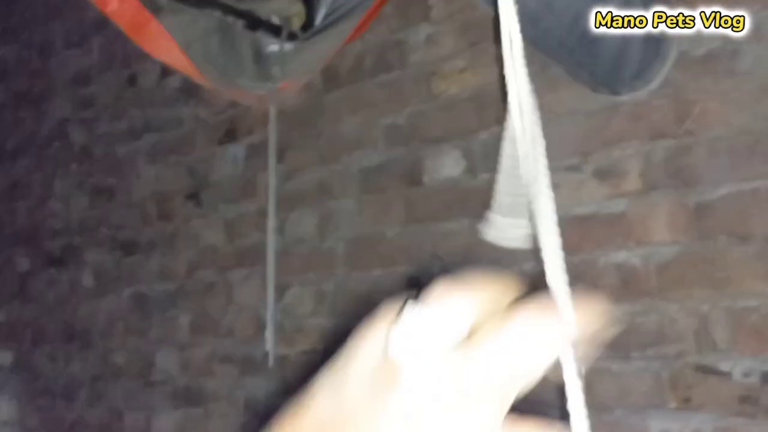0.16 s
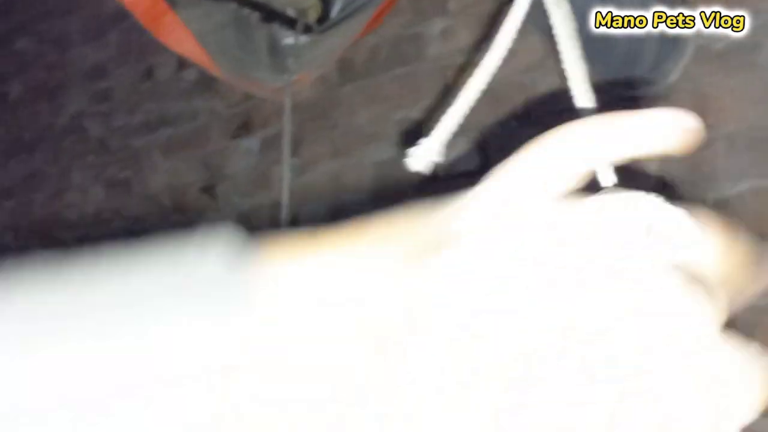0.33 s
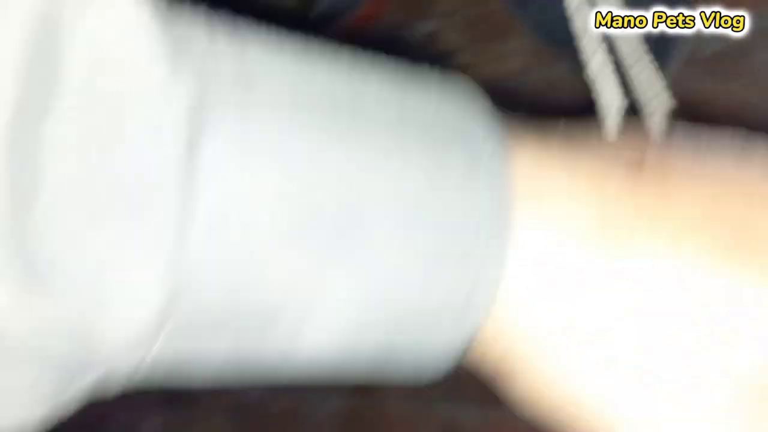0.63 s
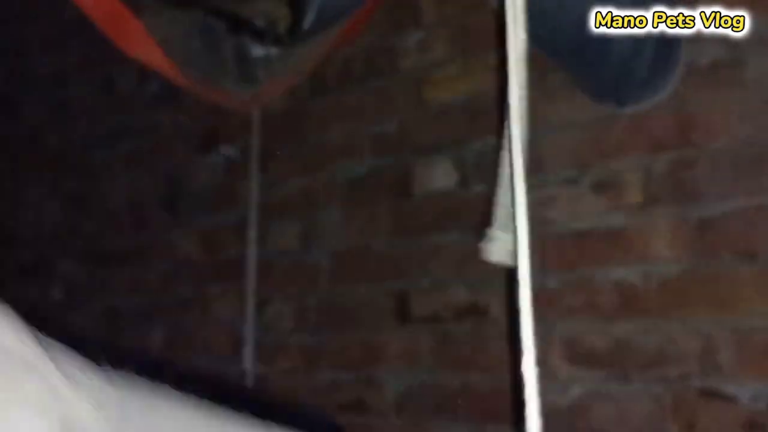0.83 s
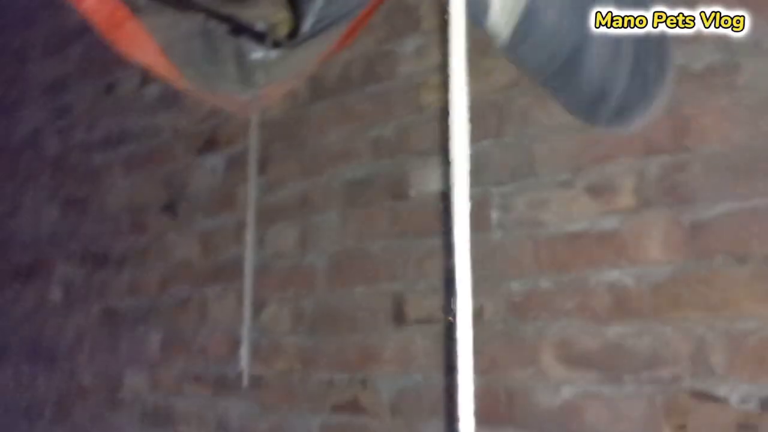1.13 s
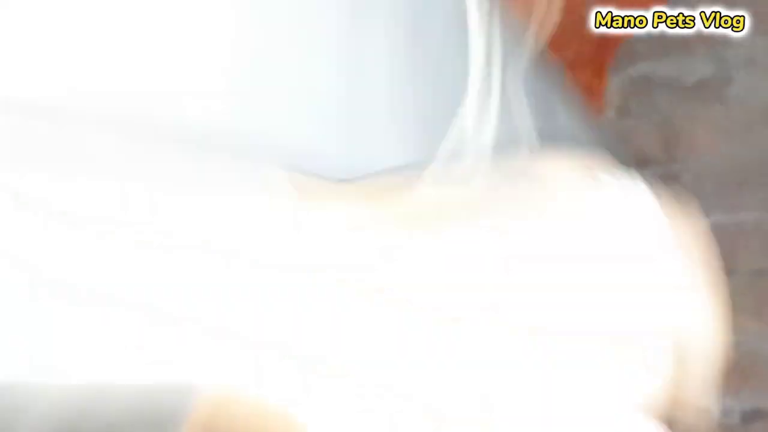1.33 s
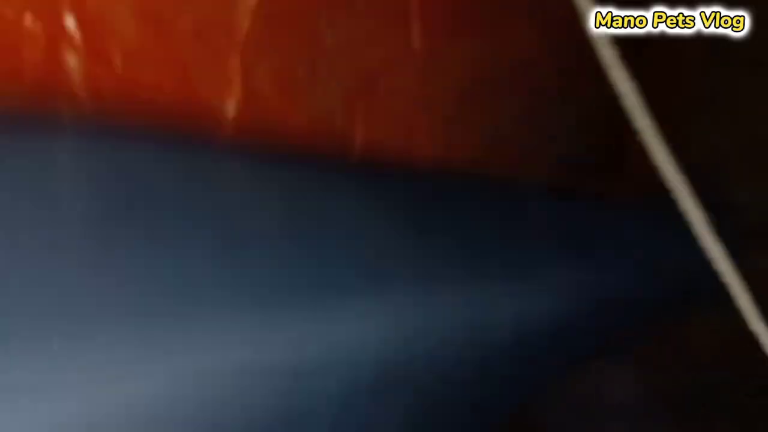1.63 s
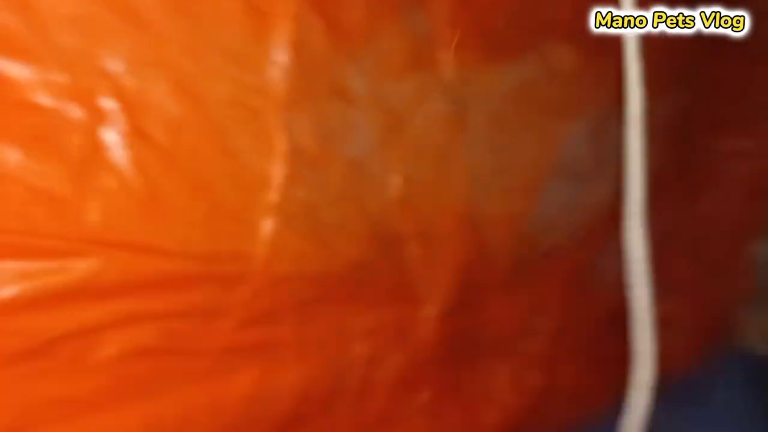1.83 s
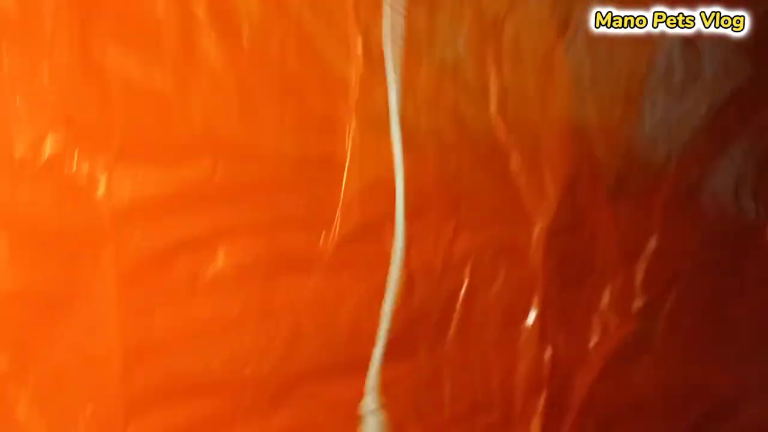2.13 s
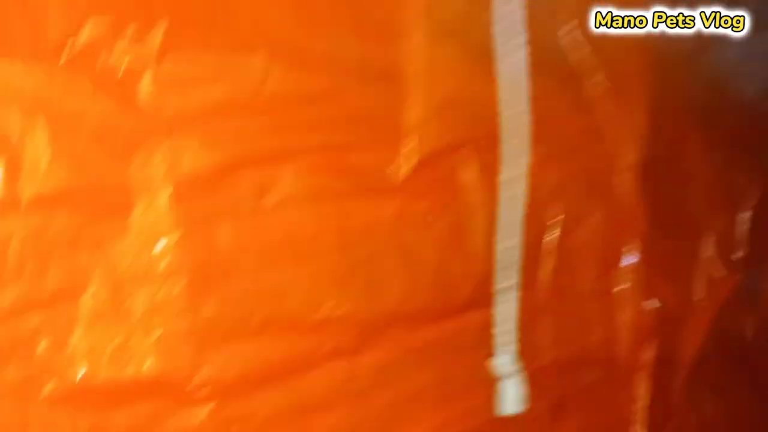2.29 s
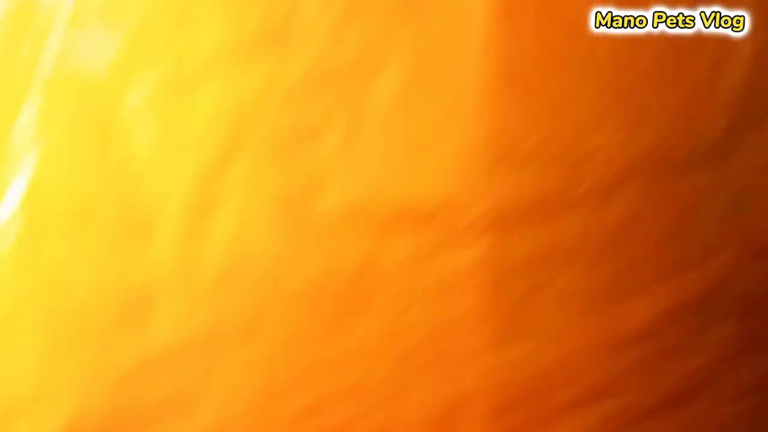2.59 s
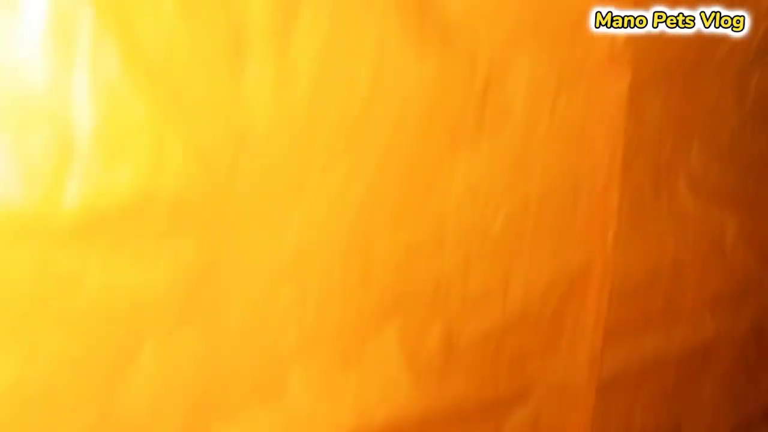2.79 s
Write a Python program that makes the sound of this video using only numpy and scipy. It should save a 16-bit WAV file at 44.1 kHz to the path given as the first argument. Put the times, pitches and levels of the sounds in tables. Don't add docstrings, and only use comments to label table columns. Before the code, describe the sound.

Crinkling plastic sheeting slides and crackles close up, with cord rubs and hard knocks on the microphone

```python
import sys
import numpy as np
from scipy import signal
from scipy.fft import rfft, irfft
from scipy.io import wavfile

SR = 44100
rng = np.random.default_rng(int(sys.argv[2]) if len(sys.argv) > 2 else 0)


def store_pcm(level_fs):
    pcm = np.round(np.clip(level_fs, -1, 1) * 32767).astype(np.int16)
    wavfile.write(sys.argv[1], SR, np.atleast_2d(pcm).T)


def field_ratio(decibels):
    return 10 ** (np.asarray(decibels, dtype=float) / 20)


N = 130095

# f/Hz, density/dB
SHED_SPECTRUM = [(25, -26), (60, -3.5), (90, -2), (180, -15.5), (400, -16), (830, -32), (3000, -36.5),
                 (15500, -61)]
# t/s, rise/s, fall/s per 20 dB, level/dB, f/Hz
CASE_BUMPS = [(-.02, 0.027, 0.1, -29, 120.4), (-.02, 0.051, -0.25, -33, 274), (0.439, 0.016, 0.2, -37, 183),
              (2.812, 0.029, 0, -31.5, 240), (.715, 0.022, 0.1, -29, 170), (0.718, 0.031, 0.02, -26.5, 287),
              (1.052, 0.012, 0.08, -13.5, 64), (1.056, 0.0074, -0.03, -23, 167),
              (1.051, 0.0025, 0.06, -26.5, 503), (1.101, 0.015, 0.0751, -18.5, 87),
              (1.139, 0.032, 0.15, -27.5, 57), (1.35, 0.03, -0.7, -24, 67.5),
              (1.471, 0.02, -0.03, -18.5, 97.4), (1.474, 0.015, 0.03, -21.5, 259),
              (1.85, 0.078, 0.1, -30, 82.6), (1.895, 0.0067, 0.23, -32, 263),
              (2.361, 0.033, -0.22, -31.5, 85), (2.537, 0.0087, 0.16, -25.5, 93.7),
              (2.808, 0.029, 0.12, -30.5, 450), (2.722, 0.011, .05, -32.5, 450),
              (.49, 0.0093, -0.14, -29, 577)]
# t/s, rise/s, fall/s per 20 dB, level/dB, case hum re level/dB
RUB_STROKES = [(0, 0.1, -0.18, -34, -17), (.1, 0.021, -0.18, -46, -27), (.1655, 0.0059, 0, -32.5, -11),
               (.178, .02, .08, -36, -5.5), (.256, 0.013, 0.0543, -23, -17),
               (.27, 0.012, 0.11, -20.5, -8.5), (.344, .005, 0.09, -25.5, -4), (.355, 0.031, 0.1, -24, -1),
               (.436, 0.0054, 0.12, -23, -5.5), (.47, 0.025, 0.14, -33.5, -1.5),
               (.543, 0.0043, 0.14, -32, -5), (.556, 0.011, 0.13, -28.5, -0.5),
               (.59, 0.025, 0.0851, -28, 1), (.65, 0.047, -0.06, -49, 11), (.706, 0.033, 0.24, -37.5, 0),
               (.815, 0.032, 0.1, -33, -27), (2.809, 0.011, 0.09, -32.5, 6), (2.83, 0.014, 0.3, -39.5, 0),
               (2.908, 0.022, -5, -37.5, 5)]
# f/Hz, density/dB
RUB_SPECTRUM = [(450, -11), (800, -8), (1400, -1.5), (2500, 0.5), (4200, -2), (7000, -7.5), (10000, -6.5),
                (15500, -12)]
# f/Hz, width/Hz, level/dB
CASE_MODES = [(229, 90, -6), (330, 98, -6.5), (396.3, 45, -1), (452, 58, -0.5), (544, 257, -6.5),
              (820, 630, -13.5)]
# t/s, hiss left-right/dB, case left-right/dB, extra treble/dB
CAMERA_SWING = [(0, -4, -1, 5.5), (.17, -8, 1.5, -0.5), (.5, -7, 0, -1.5), (1.3, -4, 1.5, 3),
                (1.42, -2, 9.5, 1.5), (1.5, -1, 22.5, 2.5), (1.6, -2, 12, 5), (1.75, -5.5, 5.5, 4),
                (2.0, -3.5, 2, -2.5), (2.5, -4, 1.5, 1.5), (2.95, -8.5, 2, -2)]
# t/s, peak/dB, panel f/Hz
SHARP_SNAPS = [(.167, -22, 2800), (.199, -25, 2177), (0.439, -17, 4030), (1.594, -26, 2050),
               (1.6292, -18.5, 2830), (1.8435, -13, 3800), (1.854, -13, 3170), (1.8661, -13.5, 5930),
               (1.8946, -9.5, 2740), (1.9045, -12.5, 3070), (1.913, -4.5, 3320), (1.925, -16, 6930),
               (2.016, -14, 6060), (2.025, -11, 4970), (2.044, -20, 6800), (2.0745, -17, 5050),
               (2.088, -21, 4050), (2.276, -19.5, 4000), (2.3022, -17.5, 2530), (2.326, -12.5, 6040),
               (2.348, -12, 4000), (2.3877, -20, 4000), (2.6977, -24, 4000), (2.8105, -25, 2360)]
# t/s, level/dB, contact with the case/dB
SHEET_SLIDE = [(1.045, -47.5, -2), (1.055, -35, 9), (1.2, -32, 2), (1.38, -27, 0), (1.485, -23.5, 1),
               (1.51, -50, 11), (1.565, -44, -8), (1.595, -36, -9), (1.67, -31.5, -6.5), (1.8, -29.5, -0.5),
               (1.95, -27, 3), (2.08, -31, -4.5), (2.15, -33.5, 3.5), (2.4, -29, 0), (2.65, -32, 1.5),
               (2.74, -40, 2.5), (2.79, -54, 3.5)]
# t/s, rise/s, fall/s per 20 dB, level/dB, case hum re level/dB
CREASE_BURSTS = [(1.0495, 0.0011, 0.01, -23, 6), (1.19, 0.044, -0.71, -31.5, 6.5),
                 (1.27, 0.076, 0.1145, -20.5, -1.5), (1.325, 0.0081, -0.0567, -18, 1.5),
                 (1.43, 0.042, 0.06, -27.5, -4.5), (1.672, 0.02, 0.4, -28.5, -11),
                 (1.842, 0.016, 0.11, -24.5, -7), (1.893, 0.0099, 0.0542, -21.5, 0),
                 (2.07, 0.0067, 1, -36.5, 0.5), (2.225, 0.0048, 0.07, -37.5, 4.5),
                 (2.342, 0.0028, 0.15, -26, 1), (2.385, .008, -4, -44, -8.5), (2.47, 0.02, 0.28, -29.5, -1),
                 (2.538, 0.0055, 0.27, -29, 0.5), (2.697, 0.011, 0.07, -31, 0)]
# f/Hz, density/dB
SHEET_SPECTRUM = [(450, -8), (800, -5.5), (1500, -7), (2300, 1.5), (3300, -2.5), (7000, -5.5), (9000, -8),
                  (12000, -2), (15500, -9)]
# f/Hz, width/Hz, level/dB
POCKET_MODES = [(1910, 230, 2), (4270, 270, -1.5)]
# t/s, peak/dB, ring f/Hz, left-right/dB, shell ring/dB
CASE_KNOCKS = [
    (1.05, -3.5, 612, 2.5, -12.5),
    (1.1, -13.5, 270, 3, -30),
    (1.4895, -1, 1430, 30, -40),
    (1.491, -2, 3020, 33, -40),
    (1.4961, -6, 1700, 30, -40),
    (1.5048, -0.5, 2220, 30, -43),
    (1.506, -6, 1500, 16, -40),
    (1.5169, 0, 1120, 36, -40),
]
# f/Hz, level/dB, t60/s
SHELL_MODES = [(2010, 0.5, .015), (4330, -1.5, 0.015), (5650, -6, .02), (7760, 2, .015)]
# t/s, f/Hz, level/dB
PEEL_SQUEAKS = [
    [(1.562, 550, -50), (1.585, 950, -36), (1.6, 1450, -34), (1.62, 1520, -46)],
    [(1.652, 2050, -38), (1.668, 2050, -33), (1.68, 2450, -28), (1.69, 2650, -33), (1.705, 2400, -38)],
    [(1.665, 2900, -40), (1.68, 3800, -31), (1.7, 4700, -28), (1.715, 4950, -30), (1.73, 4900, -35),
     (1.75, 5800, -38)],
]

SHED_DB, SHED_DIP_HZ, SHED_DIP_GAIN = -47, 800, 0.8
RISE_BEND_EXPONENT = 0.33
BUMP_WOBBLE_OCT, BUMP_ROUGH_GAIN, BUMP_WIDTH_PER_HZ = 0.2, 0.9, 0.79
RUB_GRAINS_PER_S, SHEET_GRAINS_PER_S, TREBLE_FLICKER_DB = 6000, 3000, 0.5
CASE_LIKENESS, HUM_LAG_S, RUB_HUM_TOP_HZ = 0.9, 0.0041, 630
SLIDE_HUM_DB, SLIDE_RUMBLE_DB, RUMBLE_HZ = -4.5, -8.5, 85
CREAKS_PER_S, CREAK_CYCLES, CREAK_DB = 1500, 39, -8.5
SNAP_T60_S, SNAP_DB, PANEL_CYCLES, PANEL_DB = 0.0048, 3, 28, 0
PRESSED_UNTIL_S = 1.5
KNOCK_CYCLES, KNOCK_CRACK_DB = 4.46, -9
SQUEAK_WIDTH_HZ = 120
MIC_STEP_HZ, MIC_STEP_DB, LEFT_TREBLE_DB = 7386, -7, 2.5
CLIP_TOP = 1.0


def rms_one(x):
    return x / np.sqrt(np.mean(x ** 2) + 1e-20)


def in_time(rows):
    t_s, *columns = np.transpose(rows)
    return [np.interp(np.arange(N) / SR, t_s, column) for column in columns]


def drift(rate_hz):
    r = np.exp(-80 * np.pi * rate_hz / SR)
    slow = signal.lfilter([1], [1, -2 * r, r * r], rng.standard_normal(N // 40 + 2002))[2000:]
    return np.interp(np.arange(N) / 40, np.arange(len(slow)), rms_one(slow))


def peak(x, hz, width_hz):
    r = np.exp(-np.pi * width_hz / SR)
    b = np.array([1, 0, -1]) * (1 - r * r) / 2
    return signal.lfilter(b, [1, -2 * r * np.cos(2 * np.pi * hz / SR), r * r], x + 1e-18)


def swell(start_s, rise_s, fall_s, db):
    t = np.arange(N) / SR - start_s
    rise = np.clip(t / max(rise_s, 1e-3), 0, 1) ** RISE_BEND_EXPONENT
    loss_db = 20 * np.clip(t - rise_s, 0, None) / max(fall_s, 0.03)
    return rise * field_ratio(db - loss_db)


def pan(db):
    return field_ratio(np.array([db / 2, -db / 2]))


def pair(likeness):
    mid, side = rng.standard_normal((2, N))
    return np.sqrt(1 + likeness) * mid + np.sqrt(1 - likeness) * side * [[1], [-1]]


def microphone(x):
    hz = np.fft.rfftfreq(N, 1 / SR) + 1
    above = 1 / (1 + (MIC_STEP_HZ / hz) ** 60)
    step_db = MIC_STEP_DB + LEFT_TREBLE_DB * np.array([[0.5], [-0.5]])
    return irfft(rfft(x) * field_ratio(above * step_db), N)


def coloured(x, spectrum, patchy_db, treble_db=0):
    hz, db = np.transpose(spectrum)
    edges = MIC_STEP_HZ * 2 ** np.arange(-8, 1.4, 1 / 3)
    out = 0
    for k, (low, high) in enumerate(zip(edges, edges[1:])):
        if high <= hz[0]:
            continue
        band_db = np.interp(np.log(low * high) / 2, np.log(hz), db)
        extra_db = treble_db * (k >= 24)
        gain = field_ratio(band_db + patchy_db * drift(14) + extra_db)
        sos = signal.butter(2, [low, high], "band", fs=SR, output="sos")
        out = out + (-1) ** k * gain * signal.sosfilt(sos, x)
    return out / np.sqrt(np.mean(microphone(out) ** 2))


def grains(per_s, spread_db, smooth_gain):
    sizes = field_ratio(spread_db * np.minimum(rng.exponential(1, (2, N)), 5)) * rng.choice([-1, 1], (2, N))
    clumps = field_ratio(1.6 * drift(60))
    slips = sizes * (rng.random((2, N)) < per_s * clumps / SR)
    return rms_one(slips) + smooth_gain * rng.standard_normal((2, N))


def effort(rows, under):
    powers = np.array([swell(*row[:4]) ** 2 for row in rows])
    hum_power = field_ratio([row[4] for row in rows]) ** 2 @ powers
    return np.sqrt(powers.sum(0) + under ** 2), hum_power


def shed_tone():
    tone = field_ratio(SHED_DB) * coloured(pair(0.92), SHED_SPECTRUM, patchy_db=4.0)
    return tone - SHED_DIP_GAIN * peak(tone, SHED_DIP_HZ, 500)


def bumps():
    out = np.zeros((2, N))
    for start_s, rise_s, fall_s, db, hz in CASE_BUMPS:
        wobbling_hz = hz * 2 ** (BUMP_WOBBLE_OCT * drift(hz / 5))
        started = np.arange(N) > start_s * SR
        swing = np.sin(2 * np.pi * np.cumsum(started * wobbling_hz) / SR)
        width_hz = BUMP_WIDTH_PER_HZ * hz
        rough = rms_one(peak(peak(peak(pair(0.92), hz, width_hz), hz, width_hz), hz, hz))
        out += swell(start_s, rise_s, fall_s, db) * (swing + BUMP_ROUGH_GAIN * rough)
    return out


def rub_hiss(treble_db):
    return coloured(grains(RUB_GRAINS_PER_S, 3.4, 0.92), RUB_SPECTRUM, 3.0, treble_db)


def case_hum(hum_power, slide, sheet_touches):
    shake = pair(CASE_LIKENESS) * field_ratio(1.8 * drift(27))
    hum = 0
    for k, (hz, width_hz, db) in enumerate(CASE_MODES):
        mode = peak(peak(shake, hz, width_hz), hz, 2 * width_hz)
        hum = hum + (-1) ** k * field_ratio(db + 1.86 * drift(13.4)) * mode
    hum = rms_one(hum)
    dull = signal.sosfilt(signal.butter(4, RUB_HUM_TOP_HZ, fs=SR, output="sos"), hum)
    hum = np.where(sheet_touches, hum, dull)
    rumble = rms_one(peak(peak(pair(CASE_LIKENESS), RUMBLE_HZ, 100), RUMBLE_HZ, 210))
    keep = np.exp(-1 / (HUM_LAG_S * SR))
    hum_power = signal.lfilter([1 - keep], [1, -keep], hum_power)
    hum_level = np.sqrt(hum_power + (slide * field_ratio(SLIDE_HUM_DB)) ** 2)
    return hum_level * hum + slide * field_ratio(SLIDE_RUMBLE_DB) * rumble


def creaks():
    pitches_hz = np.geomspace(900, 7000, 20)
    sizes = field_ratio(4.8 * np.minimum(rng.exponential(1, (2, N)), 4))
    slips = sizes * (rng.random((2, N)) < CREAKS_PER_S / SR)
    panel = rng.integers(0, len(pitches_hz), (2, N))
    rings = [peak(slips * (panel == k), hz, 2 * hz / CREAK_CYCLES) for k, hz in enumerate(pitches_hz)]
    return rms_one(sum(rings))


def snaps():
    out, t = np.zeros((2, N)), np.arange(800) / SR
    for start_s, db, hz in SHARP_SNAPS:
        tick = field_ratio(SNAP_DB - 60 * t / SNAP_T60_S) * rng.standard_normal((2, 800))
        ring = np.sin(2 * np.pi * (hz * t + rng.random((2, 1))))
        panel = field_ratio(PANEL_DB - 60 * t * hz / PANEL_CYCLES) * ring
        i = int(start_s * SR)
        out[:, i:i + 800] += field_ratio(db) * (tick + panel)
    return signal.sosfilt(signal.butter(2, 1500, "high", fs=SR, output="sos"), out)


def pocket(x):
    pressed = np.arange(N) < PRESSED_UNTIL_S * SR
    return x + pressed * sum(field_ratio(db) * peak(x, hz, width_hz) for hz, width_hz, db in POCKET_MODES)


def sheet_hiss(treble_db):
    return pocket(coloured(grains(SHEET_GRAINS_PER_S, 3.32, 0.77), SHEET_SPECTRUM, 2.5, treble_db))


def knocks():
    out, t = np.zeros((2, N + 2000)), np.arange(2000) / SR
    shell = sum(field_ratio(db - 60 * t / t60_s) * np.sin(2 * np.pi * hz * t) for hz, db, t60_s in SHELL_MODES)
    for start_s, db, hz, side_db, shell_db in CASE_KNOCKS:
        decay = field_ratio(-60 * t * hz / KNOCK_CYCLES)
        ring = -np.sin(2 * np.pi * hz * t) * np.minimum(t * hz, 1) * decay
        crack = rng.standard_normal(2000) * field_ratio(KNOCK_CRACK_DB - 60 * t / 0.011)
        sides = pan(side_db)[:, None] / pan(side_db).max()
        i = int(start_s * SR)
        out[:, i:i + 2000] += field_ratio(db) * sides * (4 * ring + crack + field_ratio(shell_db) * shell)
    return out[:, :N]


def squeaks():
    out, t = 0, np.arange(N) / SR
    for rows in PEEL_SQUEAKS:
        hz, db = in_time(rows)
        phase = 2 * np.pi * np.cumsum(hz + SQUEAK_WIDTH_HZ * drift(180)) / SR
        sounding = (t > rows[0][0]) * (t < rows[-1][0])
        out = out + sounding * field_ratio(db + 1 + 3 * drift(130)) * np.sin(phase)
    return out


def scene():
    slide_db, contact_db = in_time(SHEET_SLIDE)
    slide = field_ratio(slide_db + 0.2 * drift(26))
    hiss_side_db, case_side_db, treble_db = in_time(CAMERA_SWING)
    treble_db = treble_db + TREBLE_FLICKER_DB * drift(24)
    rub, rub_hum = effort(RUB_STROKES, 0)
    sheet, sheet_hum = effort(CREASE_BURSTS, slide)
    hiss = rub * rub_hiss(treble_db) + sheet * sheet_hiss(treble_db)
    creaking = np.hypot(rub, sheet) * field_ratio(CREAK_DB) * creaks()
    air = field_ratio(2) * (hiss + creaking) + squeaks() + snaps()
    body = case_hum(rub_hum + sheet_hum, slide * field_ratio(contact_db), sheet > rub) + bumps()
    return air * pan(hiss_side_db) + body * pan(case_side_db) + knocks() + shed_tone()


def band_limit(x):
    return signal.sosfilt(signal.butter(12, 15880, fs=SR, output="sos"), x)


def record(dry):
    finished = np.clip(microphone(dry), -CLIP_TOP, CLIP_TOP)
    return band_limit(finished)


dry = scene()
out = record(dry)
store_pcm(out)
```